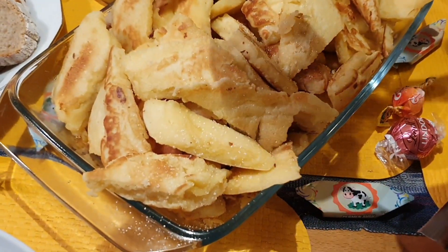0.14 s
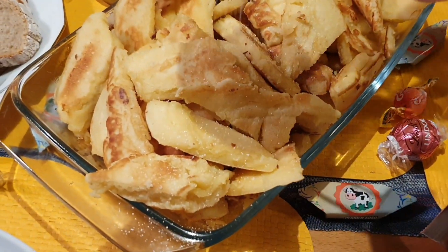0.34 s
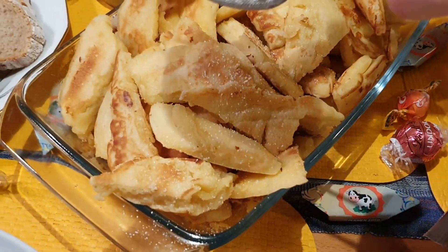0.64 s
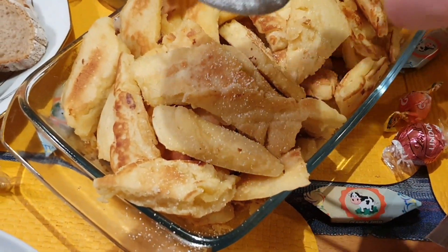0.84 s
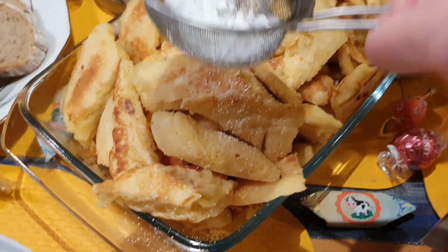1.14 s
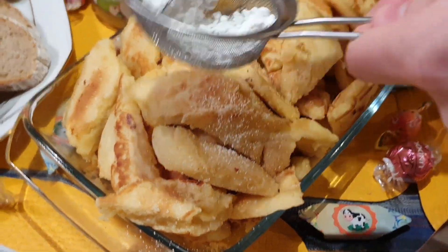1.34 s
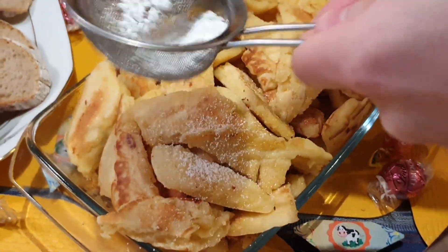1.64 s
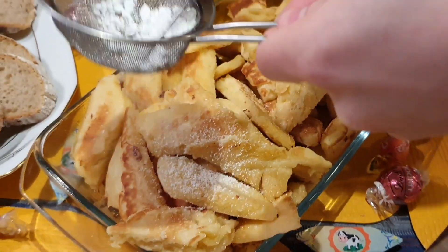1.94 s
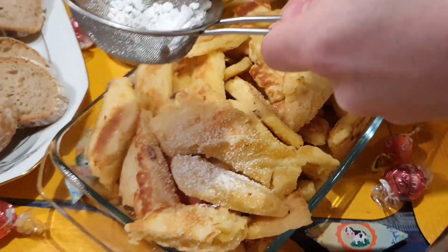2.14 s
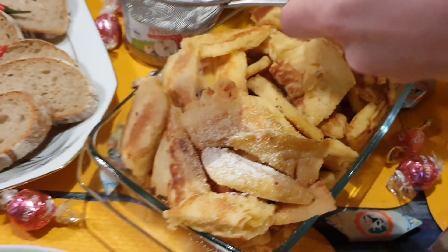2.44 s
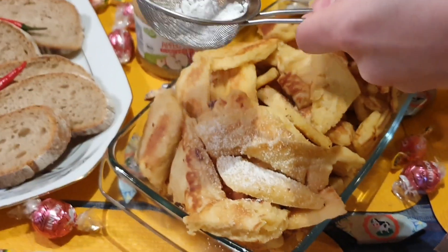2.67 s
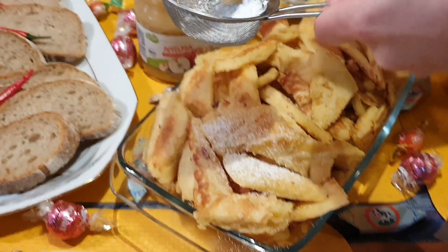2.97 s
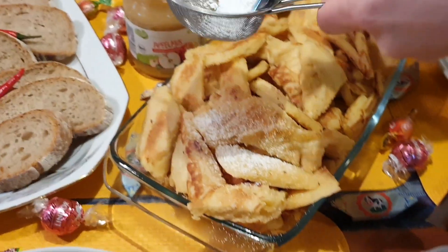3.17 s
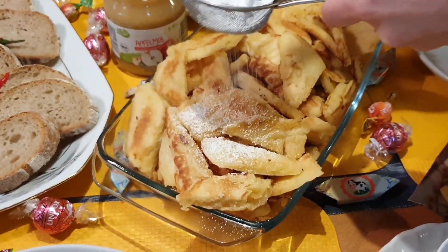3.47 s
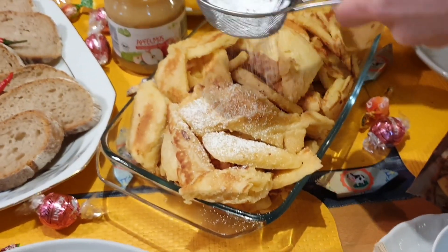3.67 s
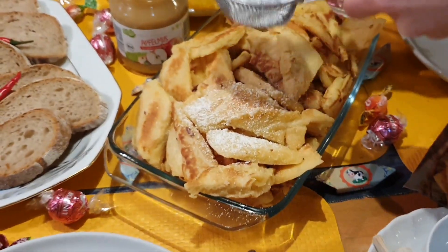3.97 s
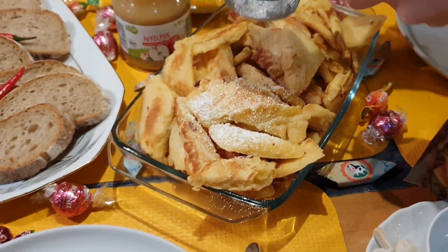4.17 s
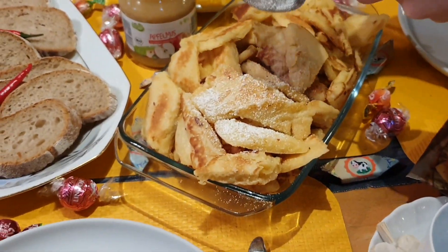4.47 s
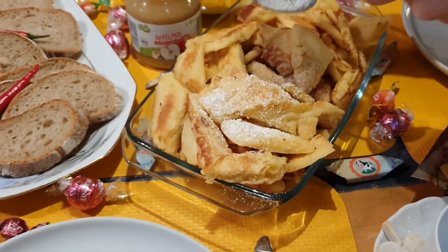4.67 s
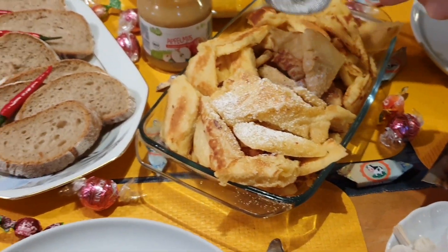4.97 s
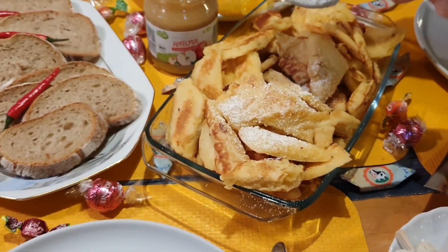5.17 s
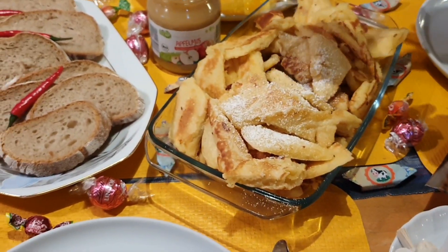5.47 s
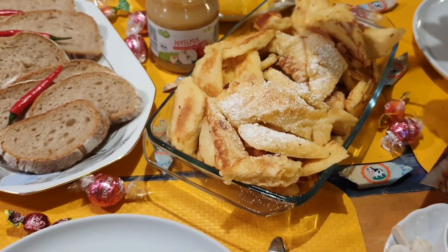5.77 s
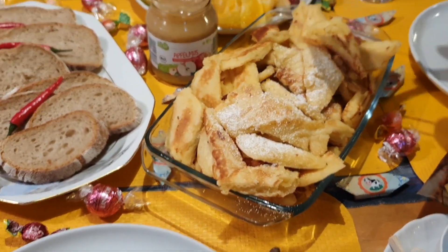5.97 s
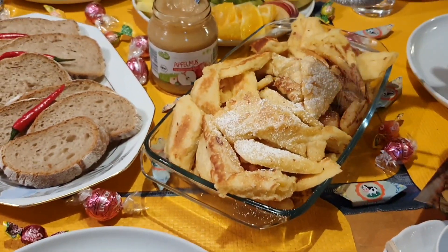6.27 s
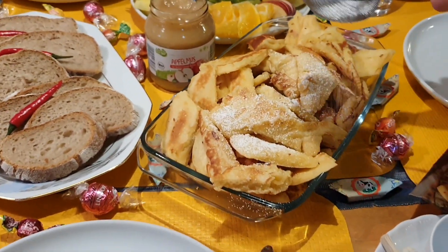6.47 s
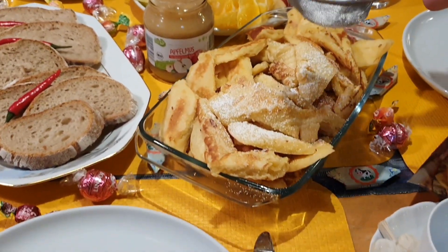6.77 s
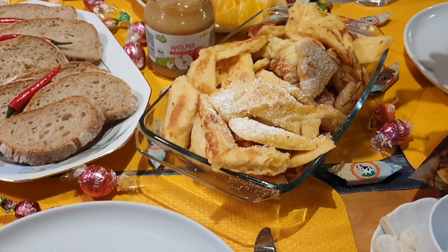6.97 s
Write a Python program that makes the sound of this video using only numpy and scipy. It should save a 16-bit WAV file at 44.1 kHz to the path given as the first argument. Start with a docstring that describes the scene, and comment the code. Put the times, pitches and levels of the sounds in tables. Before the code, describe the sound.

A quiet kitchen with soft, steady hiss and faint low handling rumble. At about 0.3 s a spoon starts scraping sugar through a small wire sieve: light, dry, sandy rasps with tiny bright ticks. Two very faint grip thuds come near 0.4 and 0.6 s, and a delicate metallic drag sings around 0.8 s. From 1.5 s the strokes grow firmer, three to five per second, each swelling briefly and cutting off quickly. A clearer dull thud lands at 2 s, with more thin singing drags at 2.3 to 2.6 s. Scraping is strongest near 3 s, with hard clicks at 2.8 and 3.0 s, then at 4.2 and 4.6 s. Gritty strokes continue, slightly softer, with sharper ticks around 6.2 and 6.4 s, until about 7 s. Rings are short and high; echoes are small. Dull whooshes come and go, and the left side carries more bass.

```python
"""From start to end a quiet kitchen hisses softly, with low rumbles and dull whooshes that come and go.
At 0.3 s a spoon starts to scrape sugar through a small wire sieve: its edge clicks over the mesh and ticks
on the rim, and mesh, rim and spoon ring in shared modes. The grip on the microphones thuds at 0.4, 0.6 and
2 s; light drags sing in the first half. Scrapes and ticks are strongest near 3 s and go on to about 7 s.
A hand-held pair of microphones hears different parts of the sieve; the left one picks up more bass."""
import sys
import numpy as np
from scipy import signal
from scipy.io import wavfile

SR = 44100
rng = np.random.default_rng(int(sys.argv[2]) if len(sys.argv) > 2 else 0)


def pcm_store(signal):
    """Save signal as 16-bit PCM."""
    levels = np.round(np.clip(np.atleast_2d(signal), -1, 1) * 32767)
    wavfile.write(sys.argv[1], SR, levels.astype(np.int16).T)


N = 313992

# modes of rim and spoon: f/Hz, width/Hz, relative level/dB
METAL = [(360, 50, -18), (520, 60, -18), (894, 40, -14), (1100, 140, -8), (2050, 90, -9), (2600, 90, -9),
         (2925, 45, -3), (3350, 90, -8), (3575, 40, -8), (3760, 90, -8), (4180, 60, -2), (4397, 80, -1),
         (5050, 80, -5), (5543, 90, -3), (5700, 120, -3), (5950, 130, -6), (6500, 120, -12),
         (7200, 120, -9), (7890, 80, -1), (8400, 120, -12), (9570, 120, -6), (10890, 120, -5),
         (11900, 120, -9), (12600, 110, -2), (13530, 80, -5)]
WANDER_DB = 5.5   # spread of the swell and fade of each mode


def strokes():
    """Touch, rise, hold and lift of the spoon: the loudest stroke sets level, tilt, pan and ring drives in dB."""
    # strokes over the mesh: start t/s, first touch level/dB, rise t/s, crest level/dB, hold t/s,
    # low body level/dB, bright fizz level/dB, ring drive near 4 kHz level/dB, near 8 kHz level/dB
    stroke_rows = [(0.3, -84, 0.012, -65, .005, 8.5, 9, -15, 4),
                   (0.376, -60, 0.037, -45, 0.014, -1, 6, -9, 5),
                   (0.529, -63.5, 0.088, -44.5, 0.0033, 0.5, 4, 7, 11),
                   (0.836, -63.5, 0.068, -51, .01, -56, 5, -27, 5), (1, -58, .01, -62, .02, 0, 6, -8, 9),
                   (1.025, -53.5, 0.079, -52.5, 0.027, -31, 6.5, -29, 6),
                   (1.181, -57, 0.043, -43.5, 0.02, -1, 4, -20, 4),
                   (1.424, -82, 0.0082, -75, .03, 12, 8, -5, 1),
                   (1.48, -59, 0.045, -37, 0.037, 1.5, 3, 1, 6), (1.685, -67, .01, -67, .02, 5, 4, -8, 2),
                   (1.723, -54.5, 0.038, -37.5, 0.016, 2.5, 5.5, 7, 2),
                   (1.907, -46.5, 0.053, -39.5, 0.036, 2, 3.5, 2, 6.5),
                   (2.114, -45, 0.059, -39.5, 0.0078, -0.5, 6, 10, 8.5),
                   (2.342, -63, 0.065, -47, 0.0055, -5, 3.5, -14, 8),
                   (2.405, -44.5, 0.026, -36, .02, -1.5, 3, -3, 6.5),
                   (2.642, -58.5, 0.024, -39.5, 0.055, 0, 3, 10, 12),
                   (2.823, -37, 0.0065, -45.5, 0.0061, 6, 1, -3, 6),
                   (2.862, -46, 0.054, -35, 0.0077, 6, 3.5, 5, 10),
                   (3.035, -47, .06, -38, 0.013, 4, -0.5, 3, 5.5),
                   (3.282, -54, 0.054, -51, 0.072, -32, 3.5, 0, 10),
                   (3.46, -64.5, 0.029, -47.5, 0.02, -3.5, 4, -20, 4),
                   (3.548, -55, 0.01, -52, 0.06, -35, 3, -12, 13),
                   (3.663, -60, 0.048, -38.5, 0.03, -2, 1, 1, 3),
                   (3.808, -44.5, 0.031, -50, 0.023, -38, 3.5, 0, -13),
                   (3.886, -48.5, .04, -37.5, .04, -5.5, 2, 1, 0),
                   (4.115, -67.5, .008, -71, .01, -1, 0, 0, -9),
                   (4.163, -58.5, .06, -35.5, 0.027, 0, 1, -0.5, 5.5),
                   (4.367, -56.5, 0.062, -38, 0.052, -2, -0.5, 1.5, 5.5),
                   (4.626, -47, .03, -46.5, .13, -7, 2.5, -1, 4.5),
                   (4.827, -61.5, 0.035, -49, 0.071, 5.5, 4, -13, 10),
                   (4.952, -53, 0.034, -50, 0.019, 1, 1, -14, 10),
                   (5.05, -56.5, 0.046, -39, .03, 2.5, 2.5, 3, 9.5),
                   (5.293, -64.5, 0.041, -39.5, 0.067, -1.5, -2, -27, -4),
                   (5.493, -65, .01, -63, .01, -3, 1, -5, 8),
                   (5.519, -55.5, 0.045, -41, 0.053, -2, 0.5, 4, 1),
                   (5.705, -64, .006, -65, .005, -11, -3, 1, 6),
                   (5.76, -56.5, 0.032, -42, 0.056, 1, 0.5, 7.5, 3.5),
                   (5.93, -64, .008, -59.5, .005, -12, 2.5, -5, 4),
                   (5.947, -62.5, 0.039, -42.5, 0.062, -3, -0.5, 7, 7.5),
                   (6.145, -59, .006, -62.5, .005, -8, -1.5, -7, 13),
                   (6.196, -39, 0.039, -38, 0.027, -5, -1, 12.5, 6.5),
                   (6.363, -49, .07, -39.5, 0.032, -1.5, 3, 7, 8.5),
                   (6.584, -50.5, 0.054, -40, 0.028, -3, 2, 6, 3.5),
                   (6.77, -62, .006, -59, .005, 1, 3, -2, -1),
                   (6.786, -48, .03, -50.5, 0.086, -6, 2.5, -1, 5.5),
                   (6.911, -54, 0.032, -52, 0.02, -41, 3, -15, 3),
                   (7.011, -63, .012, -58, .01, 1, 12, -20, 18),
                   (7.039, -58, 0.051, -46.5, .05, 8, 2.5, -13, 6.5)]
    approach_db_per_s, hold_db_per_s, lift_db_per_s = 4001, -42, -340
    low_at_touch_db, fizz_lift_db_per_s = -5, -86   # the low body fills in during the rise; the fizz dies first
    # each stroke starts left (positive) and trails off right
    touch_pan_db, touch_pan_s, hold_pan_db, lift_pan_db_per_s = 2.5, 0.028, -1, -77
    # the 4.8-7 kHz modes ring more at first
    middle_ring_db, early_ring_db, early_ring_s = 7.5, 10, 1.5

    t = np.arange(0, N + 32, 32) / SR   # one control point every 32 samples
    columns = np.transpose(stroke_rows)[:, :, None]
    start, touch_db, rise, crest_db, hold, low_db, fizz_db, ring4_db, ring8_db = columns
    since = t - start
    risen = np.clip(since / np.maximum(rise, .002), 0, 1)
    lifted = np.maximum(since - rise - hold, 0)

    level_db = touch_db + approach_db_per_s * np.minimum(since, 0) + (crest_db - touch_db) * risen
    level_db = level_db + hold_db_per_s * np.clip(since - rise, 0, hold) + lift_db_per_s * lifted
    low_db = low_db + low_at_touch_db * (1 - risen)
    fizz_db = fizz_db + fizz_lift_db_per_s * lifted
    pan_db = touch_pan_db * np.exp(-np.abs(since) / touch_pan_s) + hold_pan_db + lift_pan_db_per_s * lifted
    middle_db = middle_ring_db + early_ring_db * np.exp(-t / early_ring_s)

    controls = [level_db, low_db, fizz_db, pan_db, ring4_db + 0 * t, middle_db + 0 * start, ring8_db + 0 * t]
    loudest = level_db.argmax(axis=0), np.arange(len(t))
    return [np.interp(np.arange(N) / SR, t, c[loudest]) for c in controls]


def rasp(stroke):
    """The edge snaps over wires and sugar lumps: uneven clicks into the mesh colour and the metal modes."""
    # broad colour of the wire mesh: f/Hz, relative level per Hz/dB
    mesh_colour = [(120, -57), (200, -119), (363, -17.5), (775, -7.5), (1070, -3.5), (1880, -6), (4310, 4),
                   (7280, -2.5), (7970, -2), (11900, -2), (13000, -4), (14000, 0), (15000, -63)]
    wires_per_s, grain_spread_db = 2500, 1.5   # click rate of each source before the judder
    ring_db = -2   # rings against the broad mesh sound

    level_db, low_db, fizz_db, pan_db, *_ = stroke
    # two sources, each with its own clicks left and right
    grains = np.minimum(rng.exponential(1, (2, 2, N)), 5)
    sizes = from_db(grain_spread_db * grains) * rng.choice([-1, 1], (2, 2, N))
    judder = from_db(3.0 * drift(60, channels=1))   # the edge sticks and slips
    clicks = sizes * (rng.random((2, 2, N)) < wires_per_s * judder / SR)
    broad = coloured(clicks, mesh_colour, low_db, fizz_db, patchy_db=4.5)
    broad = rms_one(broad) * from_db(level_db)

    rings = 0
    bite_db = 0.15 * (level_db - level_db.max())   # harder strokes wake the modes more
    for k, (hz, width_hz, db) in enumerate(METAL):
        push_db = db + tilt_db(hz, low_db, fizz_db) + contact_db(hz, stroke) + bite_db
        # the contact point wanders, so each mode swells and fades on its own
        push_db = push_db + WANDER_DB * drift(15.5)
        push = clicks[k % 2] * from_db(push_db) * from_db(level_db)
        rings = rings + np.sqrt(width_hz) * resonate(push, hz, width_hz)
    rings *= from_db(ring_db) * np.sqrt(np.mean(broad ** 2) / np.mean(rings ** 2))
    return (broad + rings) * from_db(np.outer([.5], pan_db) * [[1], [-1]])


def ticks(stroke):
    """Each tick on the rim is a sub-millisecond crack, a short rattle and a fresh blow on every mode."""
    # spoon ticks: t/s, peak level/dB, left over right level/dB, brightness level/dB
    tick_rows = [(0.312, -57, -15, 15), (0.386, -44, 17, 10), (0.5259, -37.5, 15.5, 4),
                 (0.8324, -34.5, -5, 2), (1.031, -40.5, 23, 4), (1.2077, -36, 19, 14), (1.487, -53, 6, 0),
                 (1.7215, -43, -4, 11), (1.9049, -28.5, 15.5, 7), (2.1134, -33.5, 18, 9),
                 (2.348, -41, -11, -1), (2.409, -32.5, -9, 16), (2.594, -44.5, -1, 3), (2.641, -55, -4, -2),
                 (2.661, -35, 23.5, 12), (2.8206, -23.5, 1, -3), (3.037, -20, 6, 7.5),
                 (3.2213, -41, -3.0, -16), (3.2815, -37, 0, -19.5), (3.4855, -32.5, 6, 8),
                 (3.697, -28, 15, 9.5), (4.1887, -38, 21, 6), (4.2193, -21, 7, 4.5), (4.3664, -27, 18, 8.5),
                 (4.611, -40, -2, 0), (4.6258, -36, -9, 2), (4.6333, -22.5, -3, 7.5), (4.906, -33, 7, -7),
                 (5.3272, -31.5, 18, 6), (5.7325, -38, -1, 0.5), (5.7735, -38, 24, 3),
                 (6.1994, -27, 14, 11.5), (6.362, -28.5, 12.5, 7.5), (6.584, -46, -9, -12),
                 (6.787, -36.5, 13.5, 11)]
    crack_s, rattle, rattle_s = .00045, .15, 0.029   # decay times; rattle as a gain beside the crack
    crack_db, ring_db = 0, -21.5

    s, peak_db, pan_db, bright_db = np.transpose(tick_rows)
    at = np.round(s * SR).astype(int)
    side_db = peak_db + np.array([[.5], [-.5]]) * pan_db
    out, t = np.zeros((2, N)), np.arange(1500) / SR
    shape = np.exp(-t / crack_s) + rattle * np.exp(-t / rattle_s)
    noise = rng.standard_normal((len(at), 2, len(t)))
    for i, a in enumerate(at):
        dull = filtered(2, [2200, 7000], "band", noise[i] * shape)
        sharp = filtered(2, 7000, "high", noise[i] * shape)
        crack = dull + from_db(bright_db[i]) * sharp
        crack = crack / np.abs(crack).max(axis=1, keepdims=True)
        out[:, a:a + len(t)] += from_db(side_db[:, [i]] + crack_db) * crack

    luck_db = rng.normal(0, 2.24, (len(at), len(METAL), 2))
    for k, (hz, width_hz, db) in enumerate(METAL):
        blow_db = side_db + db + ring_db + tilt_db(hz, -3.5, bright_db)
        blow_db = blow_db + contact_db(hz, stroke, at) + luck_db[:, k].T
        blows = np.zeros((2, N))
        blows[:, at] = from_db(blow_db)
        out += resonate(blows, hz, width_hz) * (-1) ** k
    return out


def contact_db(hz, stroke, at=slice(None)):
    """How strongly the family of this mode is driven, over time; low body modes do not care."""
    # borders between the mode families: f/Hz
    family_edges = [3800, 4800, 7000, 9000]
    lower_db, top_db = 0.5, 4.5   # modes at 1.8-3.8 kHz and over 9 kHz
    ring4_db, middle_db, ring8_db = (c[at] for c in stroke[-3:])
    families = [lower_db, ring4_db, middle_db, ring8_db, top_db]
    return (hz > 1800) * families[np.searchsorted(family_edges, hz)]


def drags():
    """A feather-light touch wakes only the modes between 2.4 and 4.5 kHz, more to the right."""
    # the spoon drags back lightly between strokes: centre t/s, length t/s, level/dB
    drag_rows = [(0.76, 0.48, -65), (2.31, 0.41, -61), (2.585, 0.24, -64.5), (3.239, 0.12, -67.5)]
    tilt_db_per_octave = -14
    noise = rng.standard_normal((2, N))
    rings = 0
    for hz, width_hz, db in METAL:
        if 2400 < hz < 4500:
            mode_db = db + tilt_db_per_octave * np.log2(hz / 3000) + WANDER_DB * drift(33)
            rings = rings + from_db(mode_db) * np.sqrt(width_hz) * resonate(noise, hz, width_hz)
    return swells(drag_rows) * rms_one(rings) * from_db([[-3.0], [3.0]])


def kitchen(x):
    """Room echoes: six feedback delays a side, duller on every round, stepped block by block."""
    t60_s, wall_cut_hz = 0.28, 17000
    out, dull = np.zeros((2, N)), np.exp(-2 * np.pi * wall_cut_hz / SR)
    lags = (rng.uniform(.012, .03, 12) * SR).astype(int)
    for k, lag in enumerate(lags):
        loop, gain, state = x.copy(), from_db(-60 * lag / SR / t60_s), [0.]
        for i in range(lag, N, lag):
            back, state = signal.lfilter([gain * (1 - dull)], [1, -dull], loop[i - lag:i], zi=state)
            loop[i:i + lag] += back[:N - i]
        out[k % 2] += (loop - x) * (-1) ** (k // 2)
    return out


def thuds():
    """Soft blows on the microphone casing: a deep note and a short hollow knock."""
    # the grip shifts: t/s, level/dB, ring length scale t/s (longer rings for larger values)
    thud_rows = [(0.409, -67, 0.27), (0.59, -63.5, 0.18), (1.987, -44, 0.25)]
    out = np.zeros(N)
    for s, db, length in thud_rows:
        a = round(s * SR)
        blow = np.zeros(N)
        blow[a:a + 60] = from_db(db) * np.hanning(60) / 30
        deep = resonate(blow, 61, 1.3 / length)
        knock = resonate(blow, 503, 4.5 / length)
        out += deep + from_db(5.0) * knock
    return out


def whoosh():
    """A dull whoosh: noise through three low, soft resonances, partly shared by both microphones."""
    # swells over the steady level: centre t/s, length t/s, level/dB
    whoosh_rows = [(0.02, 0.33, -82), (0.73, 0.25, -78.5), (1.8, 0.19, -68), (2.05, 0.12, -68),
                   (2.65, 0.89, -73.5), (3.3, 0.18, -66.5), (3.55, 0.9, -70.5), (3.82, 0.11, -77),
                   (4.56, 0.046, -74), (5.3, 0.36, -80.5), (5.72, 0.14, -69)]
    steady_db, sway_db = -86.5, 3.5
    noise = rng.standard_normal((2, N)) + 0.7 * rng.standard_normal(N)
    hollow = sum(resonate(noise * from_db(sway_db * drift(15)), hz, 70.0) for hz in (310, 380, 470))
    hollow = filtered(3, 250, "high", hollow)
    return rms_one(hollow) * (from_db(steady_db) + swells(whoosh_rows))


def rumble():
    """Low handling rumble: lumpy noise around 45-140 Hz."""
    # swells over the steady level: centre t/s, length t/s, level/dB before the lumps
    rumble_rows = [(0.42, 0.045, -71), (1.03, 0.078, -73), (1.57, 0.048, -69), (2.03, 0.19, -65.5),
                   (2.6, 0.66, -79.5), (2.87, 0.085, -69), (3.75, 0.067, -72), (5.83, 0.074, -75.5),
                   (6.03, 0.081, -76)]
    steady_db = -80.5   # before the lumps
    noise = filtered(2, [45, 140], "band", rng.standard_normal((2, N)))
    lumps = from_db(2.6 * drift(11.4))
    return rms_one(noise) * (from_db(steady_db) + swells(rumble_rows)) * lumps


def room_air():
    """Quiet room and microphone hiss: steady noise, shaped band by band."""
    # colour of the hiss: f/Hz, relative level per Hz/dB
    air_colour = [(88, -34), (150, -19), (267, -15), (306, 5), (425, 5), (674, -16), (818, 24), (936, 4),
                  (1490, 3), (2020, 4.5), (15000, -5)]
    hiss = coloured(rng.standard_normal((2, 2, N)), air_colour, 0, 0, patchy_db=0.5)
    return from_db(-79.5) * rms_one(hiss)


def coloured(sources, spectrum, low_db, high_db, patchy_db):
    """Narrow bands with their own level, flicker and likeness; neighbours take unrelated sources."""
    # likeness of left and right: f/Hz, likeness (0 to 1)
    likeness = [(150, 0.11), (400, 0.36), (800, 1), (1500, 0.016), (15000, 0.017)]
    out, edges = 0, 150 * 2 ** np.arange(0, 7.1, .4)
    for k, (low, high) in enumerate(zip(edges, edges[1:])):
        left, right = filtered(2, [low, high], "band", sources[k % 2])
        hz = np.sqrt(low * high)
        share = np.clip(at_hz(likeness, hz), 0, 1) / 2
        pair = np.array([left + share * right, right + share * left])
        band_db = at_hz(spectrum, hz) + tilt_db(hz, low_db, high_db) + patchy_db * drift(27)
        out = out + pair * from_db(band_db)
    return out


def resonate(x, hz, width_hz):
    """One mode, at least 5 Hz wide; a unit click rings with a height of about 1."""
    r, w = np.exp(-np.pi * max(width_hz, 5) / SR), 2 * np.pi * hz / SR
    return signal.lfilter([0, np.sin(w)], [1, -2 * r * np.cos(w), r * r], x + 1e-18)


def tilt_db(hz, low_db, high_db):
    """Gain from the low-body and fizz controls: full below 1 kHz and above 8.9 kHz, none at 2-6.3 kHz."""
    low = np.clip(np.log2(2000 / hz), 0, 1)
    high = np.clip(2 * np.log2(hz / 6300), 0, 1)
    return low * low_db + high * high_db


def drift(rate_hz, channels=2):
    """Slow chance for each channel, spread 1, held for 40 samples at a time."""
    r = np.exp(-80 * np.pi * rate_hz / SR)
    noise = rng.standard_normal((channels, N // 40 + 2002))
    slow = signal.lfilter([1], [1, -2 * r, r * r], noise)[:, 2000:]   # skip the run-in
    return np.repeat(rms_one(slow), 40, axis=1)[:, :N]


def swells(rows):
    """Bell-shaped gains from rows of centre t/s, length t/s, level/dB."""
    t = np.arange(N) / SR
    return sum(from_db(db) * np.exp(-(2 * (t - s) / length) ** 2) for s, length, db in rows)


def filtered(order, hz, kind, x):
    """Butterworth filter."""
    return signal.sosfilt(signal.butter(order, hz, kind, fs=SR, output="sos"), x)


def at_hz(points, hz):
    """Read a spectrum on a log-frequency axis."""
    f, value = np.array(points).T
    return np.interp(np.log(hz), np.log(f), value)


def from_db(db):
    """Decibels to gain."""
    return 10 ** (np.asarray(db) / 20)


def rms_one(x):
    """Scale to rms 1."""
    return x / np.sqrt(np.mean(x ** 2) + 1e-20)


def scene():
    """Sieve in the room, over the room hiss and the low sounds."""
    stroke = strokes()
    sieve = rasp(stroke) + ticks(stroke) + drags()
    sieve = filtered(3, 270, "high", sieve)   # too small to radiate bass
    echoes = from_db(-13) * kitchen(sieve.mean(axis=0))
    return sieve + echoes + thuds() + whoosh() + rumble() + room_air()


def record(dry):
    """The right microphone has little bass and less treble; on both the top drops steeply and then ends."""
    right_bass_cut_hz, right_treble_hz, right_treble_db = 480, 7000, -2
    cutoff_hz, edge_hz = 14650, 16500
    right = filtered(2, right_bass_cut_hz, "high", dry[1])
    treble = filtered(1, right_treble_hz, "high", right)
    right = right + (from_db(right_treble_db) - 1) * treble
    steep = signal.ellip(8, .5, 32, cutoff_hz, fs=SR, output="sos")
    end = signal.cheby2(12, 70, edge_hz, fs=SR, output="sos")
    return signal.sosfilt(end, signal.sosfilt(steep, [dry[0], right]))


dry = scene()
out = record(dry)
pcm_store(out)
```